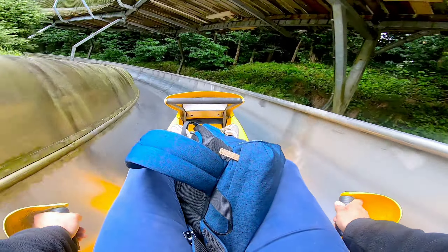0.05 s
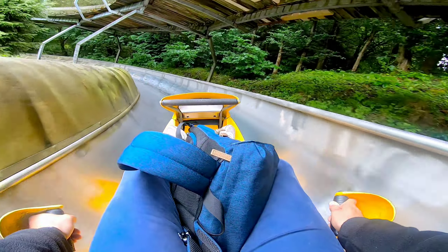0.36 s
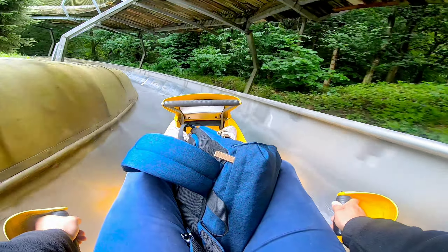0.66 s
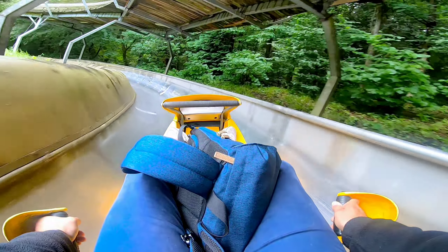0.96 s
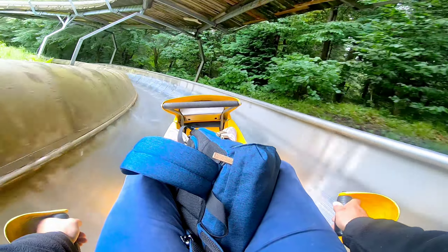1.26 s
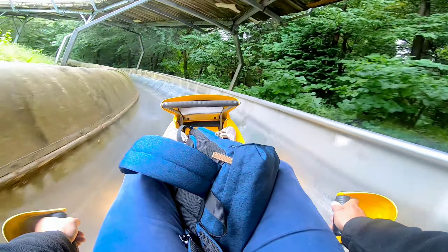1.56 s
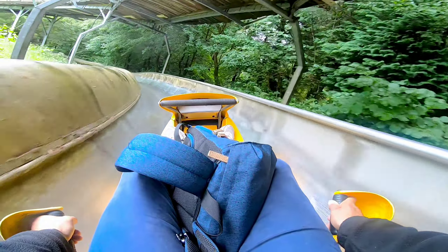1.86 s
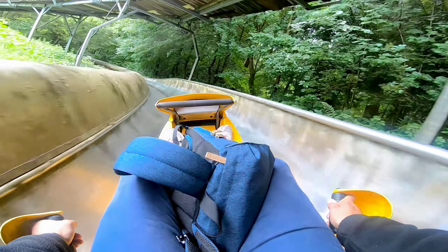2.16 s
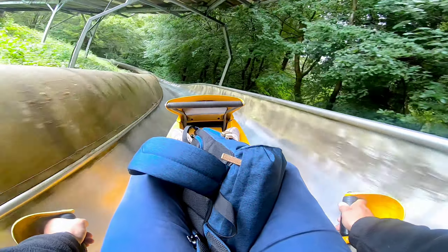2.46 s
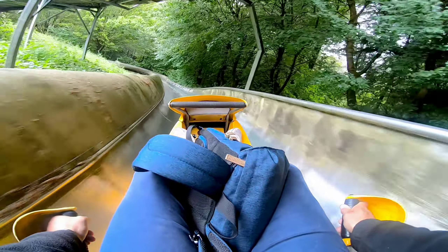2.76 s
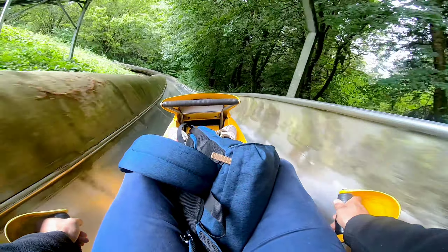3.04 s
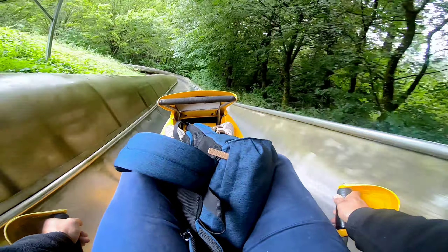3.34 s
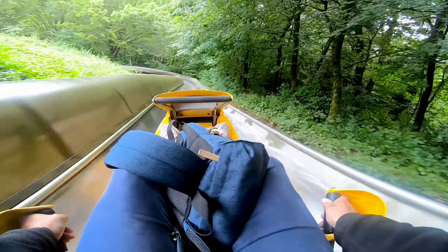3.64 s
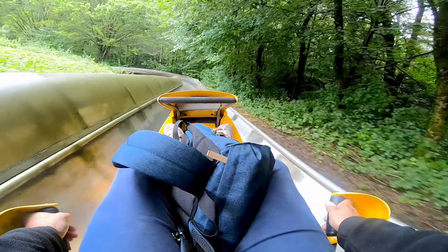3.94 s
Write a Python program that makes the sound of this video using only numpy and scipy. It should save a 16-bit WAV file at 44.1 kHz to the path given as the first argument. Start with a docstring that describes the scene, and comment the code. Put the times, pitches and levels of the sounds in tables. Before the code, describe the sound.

A sled rolls along an outdoor metal track with a throbbing, hollow roar. Small squeaks and scrapes come first, then a cluster of dull bumps midway, with faint gritty ticks and low wind gusts on the rider's close microphone.

```python
"""In a bend of a steel trough, heard from the rider's seat of a fast sled on wheels.
The trough drones under the wheels in three beating low notes and sings a higher one. The sled's
hollow shell roars, and seams in the track bump it. The runners rub, chirp, grind and scuff against
the banked wall, grit crackles and ticks, and wind buffets the microphone."""
import sys
import numpy as np
from scipy.fft import rfft, irfft, next_fast_len
from scipy.io import wavfile
from scipy.ndimage import uniform_filter1d, minimum_filter1d, map_coordinates

SR = 44100
rng = np.random.default_rng(int(sys.argv[2]) if len(sys.argv) > 2 else 0)


def transcribe(u):
    """Save the signal u as a 16-bit wav file named by the first command-line argument.

    u: samples, shape (n,) or (channels, n), limited to [-1, 1]; the rate is SR.
    q: integer samples, one column per channel.
    """
    v = np.clip(np.atleast_2d(u).T, -1, 1)
    q = np.round(v * 32767).astype(np.int16)
    wavfile.write(sys.argv[1], SR, q)


N = 176400

# how loud the sliding hiss is (time [s], level [dB])
HISS_LEVEL = [(0.0, -45.5), (0.07, -49.5), (0.66, -55), (1.4, -54.5), (1.92, -53.5), (2.1, -51),
              (2.22, -56.5), (2.32, -51.5), (2.52, -54), (2.96, -53), (3.12, -53), (3.25, -55), (3.69, -59),
              (4.0, -56.5)]
# tone colours of rubbing on steel and of crackling dirt (frequency [Hz], level [dB])
RUB_SPECTRUM = [(400, -37.5), (800, 6.5), (1080, 7.5), (1230, 2.5), (1400, 4.5), (1600, -12), (1780, -2),
                (2050, -1.5), (2300, -2), (2800, -14.5), (4000, -50)]
CRACKLE_SPECTRUM = [(3000, -15.5), (7000, 8.5), (8200, 6.5), (9500, -4), (11200, 2.5), (12800, -0.5),
                    (14000, -10.5), (15400, -20.5)]


def drone(waver_hz=2.23, flutter_db=1.46):
    """The wheels shake three low notes out of the trough, close enough in pitch to throb together."""
    # how loud each note is (time [s], level [dB])
    low_level = [(0.0, -35), (0.17, -23), (0.8, -25), (0.921, -16.5), (0.96, -28), (1.39, -17),
                 (1.459, -40.5), (2.31, -23), (2.41, -37.5), (2.46, -15.5), (2.579, -33), (2.72, -18.5),
                 (2.83, -18), (2.87, -24), (3.06, -23), (3.15, -31), (3.3, -37), (3.36, -10.5), (3.40, -20),
                 (3.429, -32), (3.48, -26.5), (3.52, -9), (3.56, -25), (3.6, -29.5), (3.69, -39),
                 (3.739, -18.5), (3.8, -48), (3.86, -20), (3.909, -13), (3.95, -25.5), (4.0, -28)]
    middle_level = [(0.0, -28), (0.05, -23.5), (0.22, -28), (0.3, -16), (.42, -19), (0.921, -24.5),
                    (0.98, -14.5), (1.12, -21), (1.2, -22), (1.45, -26), (1.65, -17), (1.85, -19.5),
                    (1.9, -26), (2.04, -12), (2.11, -22.5), (2.28, -21.5), (2.37, -11.5), (2.44, -19),
                    (2.55, -15), (2.751, -28.5), (2.84, -24), (2.921, -15.5), (3.0, -27.5), (3.3, -27),
                    (3.45, -39), (3.61, -17), (3.7, -30.5), (4.0, -26)]
    high_level = [(0.0, -10.5), (.12, -24), (0.25, -18.5), (0.38, -25), (0.77, -17.5), (0.87, -27.5),
                  (1.04, -17), (1.2, -22), (1.33, -26), (1.48, -14.5), (1.67, -29), (1.93, -20.5),
                  (2.06, -29), (2.14, -17), (2.45, -39.5), (2.65, -18.5), (2.85, -33.5), (2.98, -18),
                  (3.06, -33), (3.14, -31), (3.7, -32), (3.81, -19), (3.88, -27.5), (3.95, -25), (4.0, -27)]
    # each note wanders as the load shifts (time [s], pitch [Hz])
    low_pitch = [(0, 76), (1.3, 76), (2.0, 81.64), (2.45, 77.55), (2.7, 84.7), (2.8, 79.8), (3.05, 83.6),
                 (3.31, 86.7), (3.39, 77.1), (3.48, 77.64), (3.56, 93.3), (3.73, 74.54), (3.88, 86.1),
                 (4, 96.6)]
    middle_pitch = [(0, 101), (1.05, 104.3), (2.05, 104), (2.33, 96.5), (2.45, 102.2), (2.7, 101.5),
                    (2.92, 97), (4, 104)]
    high_pitch = [(0, 120.3), (.25, 123.6), (.7, 121), (1.45, 126), (1.58, 120), (2.15, 127.3),
                  (3.2, 124.7), (3.8, 135.8), (4, 132)]
    out = np.zeros(N)
    for pitch, level in (low_pitch, low_level), (middle_pitch, middle_level), (high_pitch, high_level):
        gain = amp(curve(level) + flutter_db * wobble(25))
        out += gain * np.sin(phase(curve(pitch) + waver_hz * wobble(22.175)))
    return amp(3) * out


def roar(wheel_angle):
    """Rolling noise rings in the hollow shell and swells with each turn of the wheels."""
    # how loud the low and upper parts are (time [s], level [dB])
    low_level = [(0, -24), (.27, -29), (.41, -23), (.59, -27.5), (.75, -28), (.95, -24), (1.25, -28.5),
                 (1.42, -21.5), (1.53, -25.5), (1.66, -24.5), (1.92, -23.5), (2.15, -26), (2.36, -20.5),
                 (2.49, -27.5), (2.85, -26), (2.94, -33.5), (3.1, -28.5), (3.6, -30.5), (4, -34)]
    upper_level = [(0.0, -35.5), (1.18, -36.5), (1.24, -43.5), (1.41, -31.5), (1.53, -37.5), (1.63, -29.5),
                   (1.75, -41.5), (1.85, -30), (2.0, -39.5), (2.05, -24.5), (2.17, -36.5), (2.36, -28.5),
                   (2.48, -42), (2.84, -33.5), (2.96, -40), (4.0, -40)]
    # their tone colours (frequency [Hz], level [dB])
    low_spectrum = [(100, -22), (150, 0.5), (205, -2), (228, 0.5), (265, -0.5), (290, 2.5), (330, -3),
                    (385, 0.5), (450, -11.5), (700, -38), (1800, -63)]
    upper_spectrum = [(300, -13.5), (420, 0.5), (465, -3.5), (505, 2), (545, 2.5), (580, 1.5), (650, -2.5),
                      (780, -5), (950, -15.5), (1800, -27), (4000, -80)]
    # the shell's own notes, before gliding (pitch [Hz], width [Hz], level [dB])
    shell_notes = [(206.8, 14, -11), (251.6, 19.6, -8.5), (315.3, 24.6, -11), (350.9, 30, -13.5),
                   (420, 16, -23), (504.5, 24, -18)]
    # the low part sinks as the sled leaves the bend (time [s], pitch [ratio])
    glide = [(0, 1.004), (.4, 1.055), (.75, 1.038), (1.7, 0.97), (2.3, 1.036), (2.75, 1), (3.2, .95),
             (3.6, 0.91), (4, 0.92)]
    hollow = amp(-3.5) * noise(low_spectrum)
    hollow += sum(amp(db) * resonance(hz, width) for hz, width, db in shell_notes)
    # reading the noise faster or slower shifts its pitch
    gliding = map_coordinates(hollow, [np.cumsum(curve(glide))], order=1, mode="mirror")
    upper = amp(curve(upper_level) - 2) * noise(upper_spectrum)
    swell = amp(0.54 * wobble(16) + 0.72 * np.sin(wheel_angle))
    return swell * (amp(curve(low_level)) * gliding + upper)


def sing(waver_hz=4):
    """The wheels keep one clear note ringing in the hollow of the trough."""
    # how loud the note is (time [s], level [dB])
    level = [(0, -40.5), (.2, -28.5), (.44, -27.5), (.5, -43.5), (.7, -40), (.76, -27), (1.0, -27),
             (1.3, -31), (1.52, -38), (1.65, -32.5), (1.79, -23.5), (1.87, -30.5), (2.3, -35), (2.55, -37),
             (2.7, -46), (3.7, -48), (3.87, -31.5), (4, -33)]
    # how it drifts (time [s], pitch [Hz])
    pitch = [(0, 318.8), (.2, 338), (.42, 348.8), (.75, 319), (1.0, 325), (1.2, 312), (1.42, 325.1),
             (1.72, 312), (1.95, 329.1), (2.5, 319.4), (3.2, 299.2), (3.87, 281), (4, 272)]
    gain = amp(curve(level) + 0.5 + 3.5 * wobble(22))
    return gain * np.sin(phase(curve(pitch) + waver_hz * wobble(30)))


def bumps():
    """Each seam in the track shakes the shell with a dull thud."""
    # seams under the wheels (time [s], level [dB], length [s])
    seams = [(0.373, -35, 0.0085), (0.429, -23.5, 0.036), (1.339, -19, 0.019), (1.356, -17, 0.04),
             (1.617, -18, 0.019), (2.025, -17, 0.019), (2.055, -20.5, 0.069), (2.237, -21.5, 0.024),
             (2.341, -18.5, 0.076), (2.773, -28, 0.16), (3.635, -22.5, 0.017), (3.751, -25.5, 0.023)]
    # tone colour of a thud (frequency [Hz], level [dB])
    spectrum = [(60, -19), (150, 11.5), (280, 11.5), (380, -12.5), (580, -6), (850, -13), (1500, -21.5),
                (4000, -66)]
    force = sum(amp(db) * contact(s, length, attack=0.0067, release=0.0053) for s, db, length in seams)
    return amp(-0.5) * force * noise(spectrum)


def knocks(fade_s=0.056):
    """A hard jolt rings the hollow shell, which dies away by 60 dB in fade_s."""
    # the worst jolts (time [s], level [dB])
    jolts = [(1.353, -18.5), (2.047, -19), (2.068, -21), (2.212, -20.5), (2.258, -20), (2.360, -22)]
    # notes of the knocked shell (pitch [Hz], level [dB])
    notes = [(185, -3), (255, 2), (330, -5), (520, -9.5), (660, -17)]
    out = np.zeros(N)
    for s, db in jolts:
        t = np.maximum(clock() - s, 0)
        ring = sum(amp(level + rng.normal(0, 2)) * np.sin(2 * np.pi * hz * t) for hz, level in notes)
        out += amp(db - 60 * np.minimum(t / fade_s, 2)) * ring
    return out


def sliding(wheel_angle):
    """The runners slide on dirty steel; one unsteady pressure makes all their noises swell together."""
    # how loud the rub, the steel's ring, the higher rasp and the dirt are (time [s], level [dB])
    rub_level = [(0.0, -36), (0.2, -40), (0.47, -45), (0.62, -45), (0.86, -45), (1.6, -45), (1.88, -42.5),
                 (1.97, -45), (2.1, -46.5), (2.49, -45.5), (3.04, -43.5), (3.81, -51), (4.0, -52.5)]
    ring_level = [(0, -49), (.3, -55.5), (.5, -47.5), (.8, -53), (.95, -48.5), (1.15, -55), (1.7, -57),
                  (1.95, -44), (2.2, -53.5), (2.5, -49.5), (2.9, -56.5), (3.06, -53.5), (3.11, -42),
                  (3.19, -52), (3.24, -40.5), (3.29, -52), (3.45, -53.5), (3.7, -55), (4, -65)]
    rasp_level = [(0, -47), (.3, -51), (.6, -55.5), (1.5, -57), (2.15, -58), (2.32, -54), (2.52, -58),
                  (2.85, -51), (3.15, -50), (3.28, -51.5), (3.38, -59), (4, -61.5)]
    crackle_level = [(0, -72.5), (.65, -80.5), (.8, -78.5), (1.05, -73), (1.17, -80.5), (1.4, -79),
                     (2.0, -76), (2.18, -75), (2.3, -72.5), (2.42, -69), (2.55, -73.5), (2.9, -79.5),
                     (3.2, -84), (3.52, -74.5), (3.7, -94), (4, -66)]
    # tone colour of the hiss (frequency [Hz], level [dB])
    hiss_spectrum = [(1500, -23.5), (2600, -2.5), (3300, 0), (4900, -2), (6200, -11.5), (7600, -13.5),
                     (9000, -24), (10000, -33), (12000, -30), (15000, -42.5)]
    pressure_db = 1.14 * wobble(23.595) + 1.7 * np.sin(wheel_angle)
    rub = amp(curve(rub_level) - 0.5 + 1.9 * wobble(18)) * noise(RUB_SPECTRUM)
    ring = amp(curve(ring_level) + 2.6 * wobble(55)) * resonance(hz=1552, width_hz=145)
    rasp = amp(curve(rasp_level) + 2.9 * wobble(60)) * resonance(hz=2385, width_hz=790)
    gritty_noise = noise(hiss_spectrum) + amp(-12.5) * grit(hiss_spectrum, per_s=110)
    hiss = amp(curve(HISS_LEVEL) - 2) * gritty_noise
    crackle = amp(curve(crackle_level) + 2.4 * wobble(35)) * grit(CRACKLE_SPECTRUM, per_s=260)
    return amp(pressure_db) * (rub + ring + rasp + hiss + crackle)


def chirps(waver_hz=75.6, base_stutter_hz=96, bend_hz_per_s=4000, soften_above_hz=1550):
    """A runner sticks and slips in a quick stutter of squeaks, each bending in pitch its own way."""
    # squeaks on the steel (time [s], level [dB], pitch [Hz], length [s])
    squeaks = [(0.302, -29, 1364, 0.04), (.386, -27.5, 1450, 0.017), (0.443, -30.5, 1490, 0.01),
               (0.48, -25, 1076, 0.03), (0.641, -22, 1540, 0.016), (0.847, -30, 1210, 0.023),
               (0.927, -29, 1543, 0.021), (1.037, -26, 1415, 0.0097), (1.115, -23.5, 1063, 0.0078),
               (1.28, -25.5, 1392, 0.0087), (1.496, -26, 1200, 0.0051), (1.573, -26, 1303, 0.0098),
               (1.648, -29.5, 1377, 0.01), (1.66, -26, 1313, 0.0096), (1.738, -32, 1400, 0.022),
               (1.8, -27, 1450, 0.027), (1.826, -30, 1189, 0.021), (1.894, -23, 1487, 0.021),
               (1.922, -29.5, 1450, 0.04), (1.986, -25.5, 1528, 0.02)]
    out = np.zeros(N)
    waver = waver_hz * wobble(480)
    scrape = amp(-24) * noise(RUB_SPECTRUM)
    for s, db, hz, length in squeaks:
        t = np.maximum(clock() - s, 0)
        slips = np.abs(np.sin(np.pi * base_stutter_hz * rng.uniform(0.9, 1.4) * t)) ** .5
        bend = bend_hz_per_s * rng.standard_normal() * (np.minimum(t, length) - length / 2)
        force = amp(db - 2.5) * contact(s, length, attack=0.00087, release=0.01)
        out += force * slips * (np.sin(phase(hz + waver + bend)) + scrape)
    return filtered(out, lambda hz: np.maximum(1 / np.hypot(1, (hz / soften_above_hz) ** 20), .4))


def grinds():
    """A runner leans on the wall and grinds along it."""
    # grinding strokes (time [s], level [dB], length [s])
    strokes = [(0, -35, .19), (0.206, -35, 0.13), (0.345, -42, 0.37), (1.114, -40.5, 0.17),
               (2.03, -38, 0.07), (2.539, -36.5, 0.068), (2.676, -32.5, 0.034), (2.772, -40, 0.057),
               (3.203, -34.5, 0.055)]
    # their tone colour (frequency [Hz], level [dB])
    spectrum = [(400, -26.5), (750, 2.5), (1080, 5), (1450, 5.5), (1650, -5), (1850, -20.5), (3000, -17),
                (6000, -55)]
    force = sum(amp(db) * contact(s, length, attack=0.034, release=length / 2)
                for s, db, length in strokes)
    return force * amp(-2 + 2.1 * wobble(70)) * noise(spectrum)


def squeal(pitch_hz=2188, waver_hz=54.9, drift_hz=22):
    """A runner squeals roughly, most often where the bend presses hardest."""
    # bursts of squealing (time [s], level [dB], length [s])
    bursts = [(0.713, -54, 0.02), (0.835, -44, 0.023), (1.157, -50.5, 0.046), (1.609, -48.5, 0.09),
              (1.734, -49, 0.032), (1.837, -43, 0.25), (1.999, -43, 0.13), (2.085, -51.5, 0.11)]
    force = sum(amp(db) * contact(s, length, attack=0.0071, release=.022) for s, db, length in bursts)
    tone = np.sin(phase(pitch_hz + waver_hz * wobble(220) + drift_hz * wobble(25)))
    roughness = amp(4.4 * wobble(90))
    return force * roughness * (tone + amp(-7) * resonance(pitch_hz, width_hz=390))


def scuffs():
    """The runners brush the wall in short gritty scrapes, each with its own tone colour."""
    # scrapes on the wall (time [s], level [dB], length [s])
    scrapes = [(0.241, -46.5, 0.023), (0.667, -48.5, 0.036), (0.749, -45.5, 0.011), (0.837, -58, 0.016),
               (0.916, -50.5, 0.028), (1.13, -47.5, 0.032), (1.159, -50, 0.019), (1.361, -45.5, 0.028),
               (1.612, -48, 0.0077), (1.654, -52, .012), (1.814, -45, .016), (1.837, -45.5, 0.016),
               (1.9, -49.5, 0.017), (2.04, -41.5, 0.062), (2.144, -53.5, 0.0084), (2.32, -44, 0.031),
               (2.392, -40.5, 0.0067), (2.438, -48, 0.013), (2.476, -49, 0.017), (2.642, -47.5, 0.025),
               (2.68, -52, 0.017), (2.749, -47.5, 0.014), (2.785, -48.5, 0.053), (2.899, -47.5, 0.026),
               (3.017, -45, 0.0084), (3.419, -48.5, 0.011), (3.726, -48.5, 0.049)]
    # their average tone colour (frequency [Hz], level [dB])
    spectrum = [(600, -32), (1500, 11.5), (2400, 6.5), (3400, 8.5), (5000, 2), (6500, -6), (8000, -11),
                (9500, -23), (12500, -30), (15000, -56)]
    out = np.zeros(N)
    for s, db, length in scrapes:
        colour = [(hz, level + rng.normal(0, 1.7)) for hz, level in spectrum]
        force = amp(db + 0.5) * contact(s, length, attack=0.0027, release=0.018)
        out += force * grit(colour, per_s=22000)
    return out


def ticks(pitches=14, low_hz=3000, high_hz=7770, fade_s=.022, rattle_per_s=39):
    """Grit and loose parts tick, ringing at many high pitches; a faint rattle follows the hiss."""
    # the sharp ticks (time [s], level [dB])
    hits = [(.166, -46), (.251, -45), (0.3326, -43.5), (0.7522, -47), (1.0849, -42), (1.1343, -44.5),
            (1.6172, -41), (1.8173, -48), (1.8457, -40), (2.0512, -43), (2.29, -42), (2.3206, -49),
            (2.3935, -40), (2.4478, -45), (2.5915, -38.5), (2.7841, -45.5), (3.02, -40), (3.1088, -36.5),
            (3.4181, -48), (3.7379, -41)]
    out, t = np.zeros(N + SR), np.arange(SR // 20) / SR
    rattle_times = rng.random(int(rattle_per_s * N / SR)) * N / SR
    hiss_db = np.interp(rattle_times, *np.transpose(HISS_LEVEL))
    rattle_db = hiss_db - 1 + 4.5 * rng.standard_normal(len(rattle_times))
    rise = np.minimum(t / .0004, 1)
    for s, db in [*hits, *zip(rattle_times, rattle_db)]:
        hz = low_hz * (high_hz / low_hz) ** rng.random((pitches, 1))
        ring = unit((np.sin(2 * np.pi * hz * t) / np.sqrt(hz)).sum(0))
        out[int(s * SR):][:len(t)] += amp(db - 6 - 60 * t / fade_s) * ring * rise
    return out[:N]


def crunches():
    """The wheels crush stray grains with brief, very bright crackles."""
    # crushed grains (time [s], level [dB])
    grains = [(.826, -64), (.915, -64.5), (.995, -61), (1.080, -64.5), (2.062, -58), (2.29, -64),
              (2.395, -66), (2.425, -65.5), (2.59, -62), (2.905, -61)]
    force = sum(amp(db) * contact(s, length=0.021, attack=0.0037, release=.008) for s, db in grains)
    return force * grit(CRACKLE_SPECTRUM, per_s=450)


def wind():
    """Rushing air buffets the microphone with a low rumble and a few stronger gusts."""
    # gusts striking (time [s], level [dB], length [s])
    gusts = [(0.408, -19, 0.13), (0.895, -14.5, 0.16), (2.788, -27, 0.053), (3.625, -16, 0.087)]
    # tone colours of the rumble and the gusts (frequency [Hz], level [dB])
    rumble_spectrum = [(10, -6), (25, -1.5), (35, -6), (48, -5.5), (62, 1), (90, -0.5), (150, -7.5),
                       (400, -48), (1500, -78.5)]
    gust_spectrum = [(10, -11.5), (25, -5), (40, 5), (60, -0.5), (90, -16.5), (200, -47.5), (600, -89)]
    force = sum(amp(db) * contact(s, length, attack=0.053, release=0.019) for s, db, length in gusts)
    rumble = amp(-22.5 + 1.4 * wobble(26)) * noise(rumble_spectrum)
    return rumble + force * noise(gust_spectrum)


def amp(db):
    """Turn decibels into a number to multiply by."""
    return 10 ** (np.asarray(db) / 20)


def unit(x):
    """Scale to an average strength (rms) of 1."""
    return x / np.sqrt(np.mean(x ** 2) + 1e-20)


def clock():
    """Time of each sample, in seconds."""
    return np.arange(N) / SR


def curve(rows):
    """Join (time [s], value) points with straight lines."""
    return np.interp(clock(), *np.transpose(rows))


def wobble(per_s):
    """A smooth curve through per_s random points a second."""
    return map_coordinates(rng.standard_normal(4096), [clock() * per_s + 4], mode="wrap")


def phase(hz):
    """Running angle of a changing frequency, from a random start."""
    return 2 * np.pi * (np.cumsum(hz) / SR + rng.random())


def contact(start, length, attack, release):
    """Strength of a touch: it rises, and fades from halfway through its length (all in seconds)."""
    t = clock() - start
    return np.clip(t / attack, 0, 1) * np.exp(-np.maximum(t - length / 2, 0) / release)


def filtered(x, response):
    """Turn each frequency in x up or down by response(hz)."""
    size = next_fast_len(N + 8192)
    return irfft(rfft(x, size) * response(np.fft.rfftfreq(size, 1 / SR)), size)[:N]


def coloured(x, spectrum):
    """Give x a tone colour (frequency [Hz], level [dB]), at strength 1."""
    f, db = np.transpose(spectrum)
    return unit(filtered(x, lambda hz: amp(np.interp(np.log(hz + 1), np.log(f), db))))


def noise(spectrum):
    """Steady noise with a tone colour."""
    return coloured(rng.standard_normal(N), spectrum)


def grit(spectrum, per_s):
    """Tiny random impacts with a tone colour."""
    impacts = (rng.random(N) < per_s / SR) * rng.uniform(-1, 1, N)
    return coloured(impacts, spectrum)


def resonance(hz, width_hz):
    """Noise ringing around one pitch, at strength 1."""
    white = rng.standard_normal(N)
    return unit(filtered(white, lambda f: (1j * f * width_hz / (hz * hz - f * f + 1j * f * width_hz)) ** 2))


def scene(turns_per_s=17, unsteadiness=0.1634):
    """Everything rides with the sled, close by and without echo."""
    wheel_angle = phase(turns_per_s * (1 + unsteadiness * wobble(8)))
    runners = sliding(wheel_angle) + chirps() + grinds() + squeal() + scuffs() + crunches()
    return (drone() + sing() + wind() + roar(wheel_angle) + runners + ticks() + bumps() + knocks())[None]


def record(dry, ceiling_db=-4.5, hold_s=.012, fade_s=.004, top_hz=15400):
    """A limiter turns down the loudest peaks, both ends fade, and the highest treble is cut."""
    hold = int(hold_s * SR)
    needed_gain = np.minimum(1, amp(ceiling_db) / (np.abs(dry[0]) + 1e-9))
    gain = uniform_filter1d(minimum_filter1d(needed_gain, 2 * hold), hold)
    ends = np.clip(np.minimum(clock(), clock()[::-1]) / fade_s, 0, 1)
    return filtered(dry[0] * gain * ends, lambda hz: hz < top_hz)[None]


dry = scene()
out = record(dry)
transcribe(out)
```